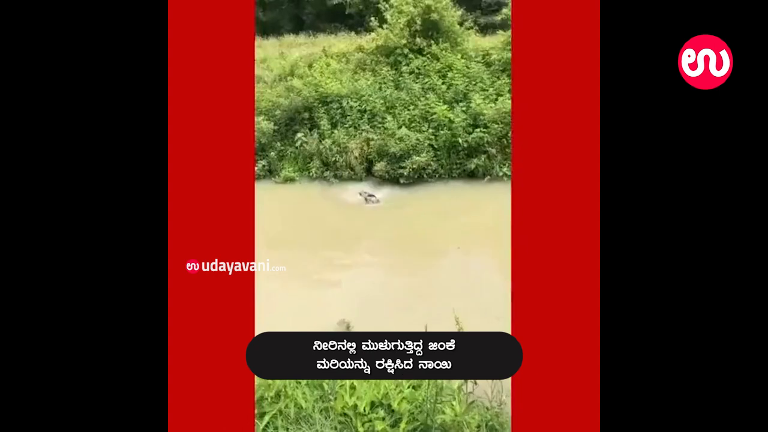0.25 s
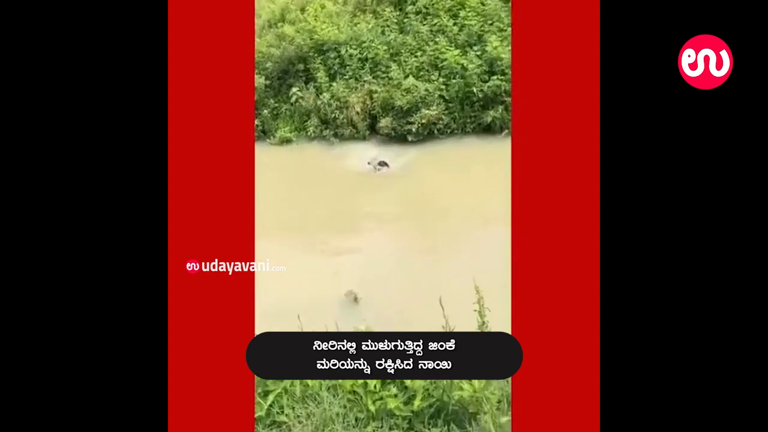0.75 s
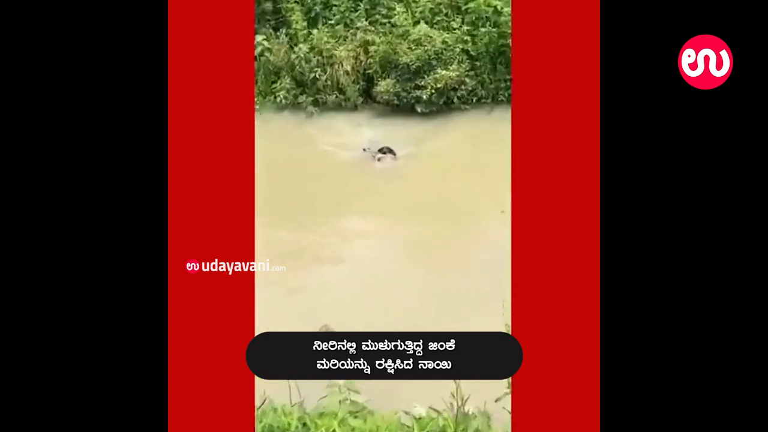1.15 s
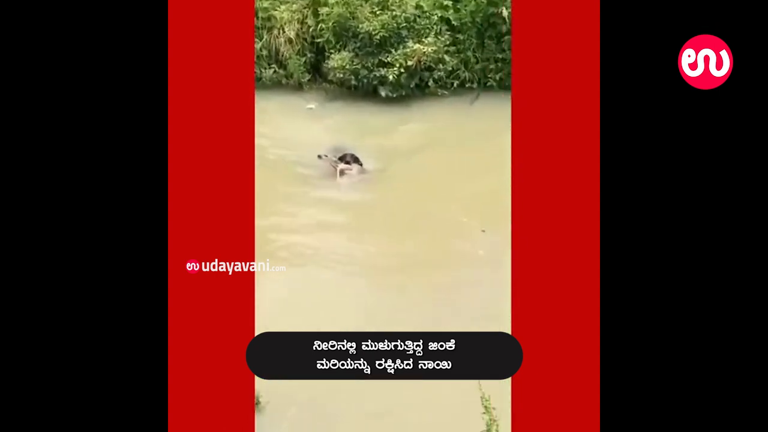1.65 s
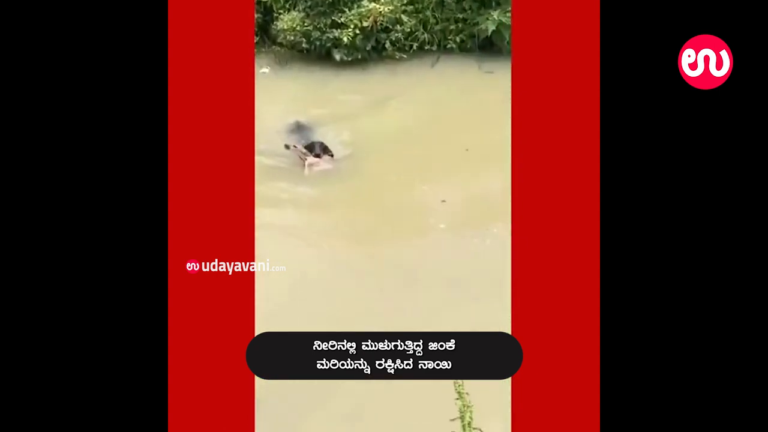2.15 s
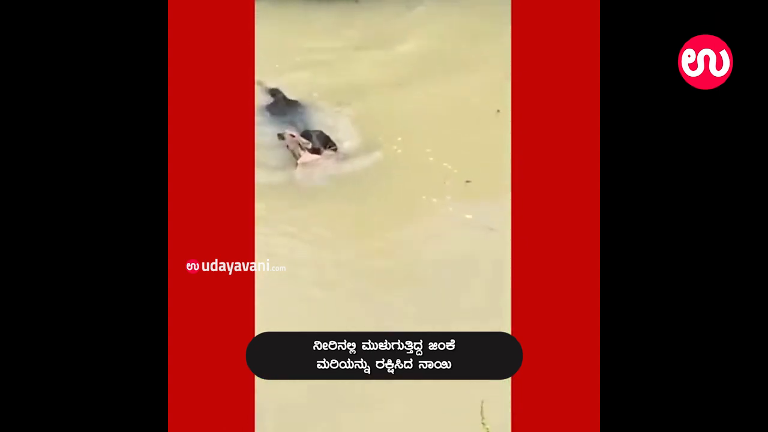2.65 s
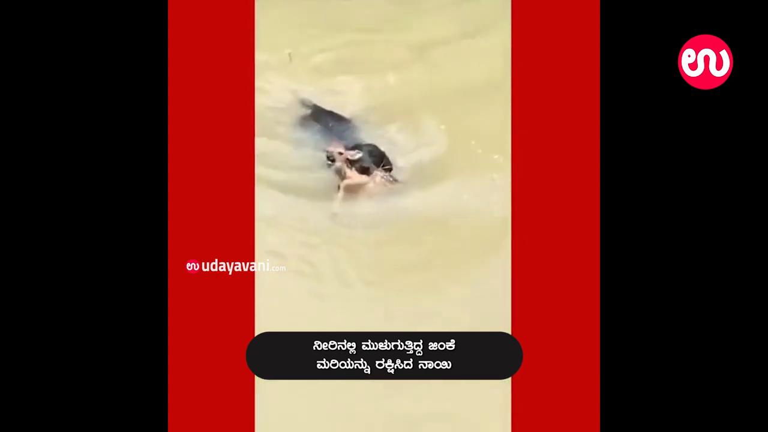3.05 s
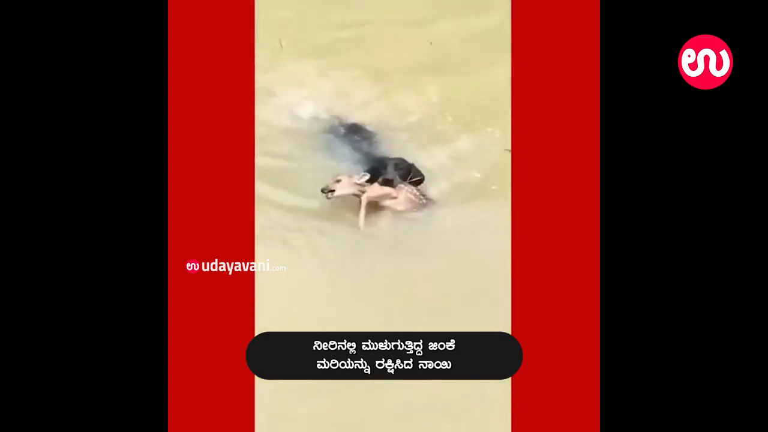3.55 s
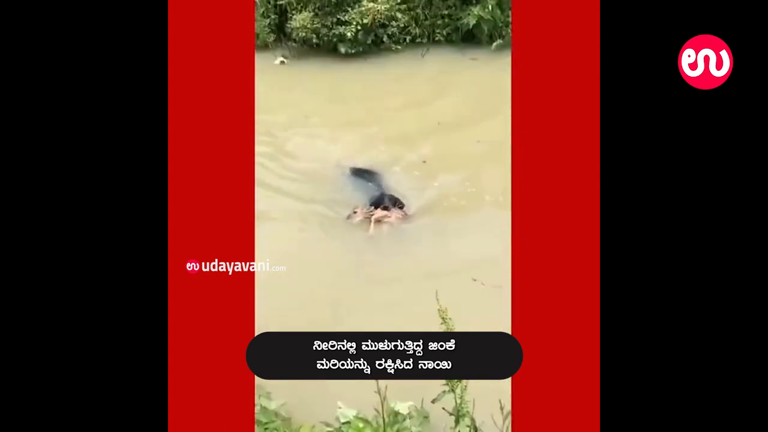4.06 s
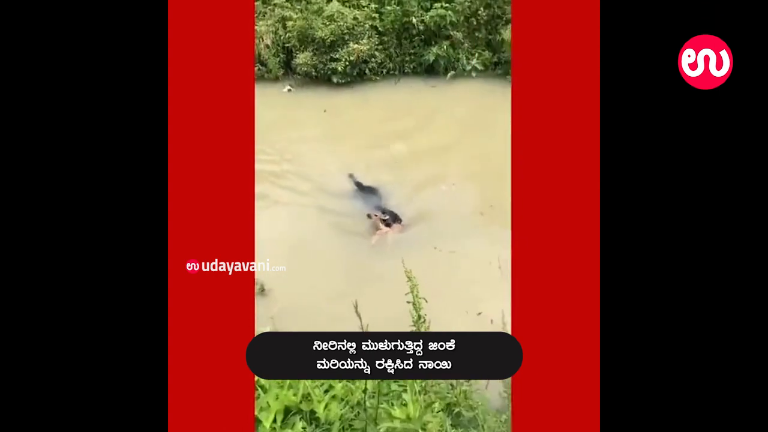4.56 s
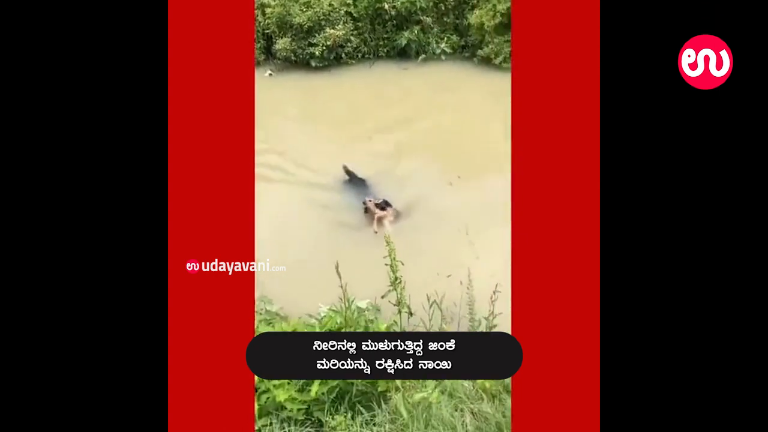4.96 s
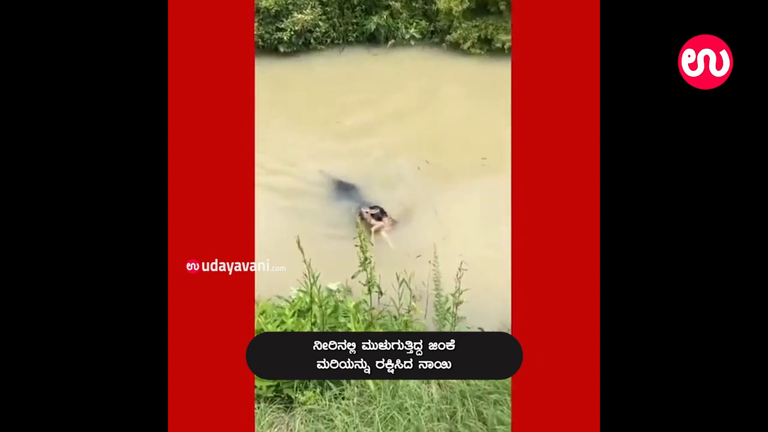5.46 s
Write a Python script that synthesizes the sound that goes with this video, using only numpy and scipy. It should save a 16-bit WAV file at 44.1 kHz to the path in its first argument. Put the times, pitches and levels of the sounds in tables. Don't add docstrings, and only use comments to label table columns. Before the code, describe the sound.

After about 0.3 s of silence the sound opens abruptly on an outdoor pond: a low single-cylinder engine putters at roughly ten pulses a second, slightly uneven, under a soft airy wash and shifting leaf hiss. Tiny bird chirps and ticks appear near 0.4 s and 1.4-1.85 s, with a light plop at 0.74 s. Paddling plops gather from 2.2 s, with faint twig snaps. A soft long snort begins at 3.0 s among more plops. From 3.22 to 3.66 s a fawn bleats once, very loud, shrill and nasal, rising slightly then falling, cracked and raspy before clearing and closing, with a faint dull echo. A strong wet snort and splashy plops come around 4.05-4.3 s, low thumps at 4.4 and 4.7 s, a chirp at 4.84 s, then a long hissing snort and plops at 5.0-5.25 s. Ticks and dry snaps finish over the unbroken engine, to about 5.6 s.

```python
import sys
import numpy as np
from scipy import signal
from scipy.fft import rfft, irfft
from scipy.io import wavfile
from scipy.ndimage import uniform_filter1d

SR = 44100
rng = np.random.default_rng(int(sys.argv[2]) if len(sys.argv) > 2 else 0)


def pcm_store(signal):
    levels = np.round(np.clip(np.atleast_2d(signal), -1, 1) * 32767)
    wavfile.write(sys.argv[1], SR, levels.astype(np.int16).T)


def volts_from_decibels(level):
    exponent = np.asarray(level, float) / 20
    return 10 ** exponent


N = 251370

START_S = 0.309

# (frequency [Hz], level [dB per Hz])
WASH = [(60, -18), (120, 6), (200, -4), (300, -13), (600, -16.5), (1000, -21.5), (1600, -20.5), (2500, -25),
        (3600, -26), (5000, -36.5), (7000, -48), (13000, -58.5)]
WASH_DB, WASH_FADE_DB_PER_S = -40, 0.38
# (frequency [Hz], width [Hz], level [dB])
HOUSING_HUMS = [(597, 46, -60), (988, 58, -59.5), (1597, 70, -61.5), (713, 14, -71.5)]
# (time [s], level [dB])
BREEZE = [(.32, -63), (.6, -70.5), (.78, -60.5), (1.54, -67.5), (1.84, -60), (2.09, -78.5), (2.95, -80.5),
          (3.1, -57), (3.7, -65.5), (4.0, -65), (4.1, -58), (4.18, -68), (4.99, -67), (5.05, -61.5),
          (5.16, -61), (5.21, -65.5), (5.3, -62), (5.7, -71)]
# (frequency [Hz], level [dB per Hz])
LEAF_COLOUR = [(1760, -42), (3000, -3.5), (3930, 0), (5610, -16), (9280, -15), (10900, -25.5), (13000, -22)]

# (time [s], peak level [dB], frequency [Hz])
TICKS = [(0.4165, -40, 3430), (2.341, -45, 3470), (2.7058, -43.5, 3440), (4.348, -39.5, 2910),
         (4.752, -36.5, 3530), (5.2206, -35.5, 3120), (5.233, -33.5, 2700)]
# (time [s], length [s], start frequency [Hz], end frequency [Hz], level [dB])
CHIRPS = [(0.4, 0.012, 3600, 3480, -41), (0.414, .014, 2760, 2760, -39.5), (.415, 0.042, 3500, 3430, -46),
          (1.44, 0.032, 3800, 3360, -48.5), (1.61, 0.03, 3900, 3680, -45), (1.63, .02, 3610, 3270, -52),
          (1.64, .028, 3950, 3650, -46), (1.694, 0.041, 3750, 3600, -55), (1.841, 0.014, 3720, 3430, -38),
          (1.847, 0.023, 3590, 3600, -44), (4.834, 0.013, 3710, 3420, -38),
          (4.839, 0.035, 3610, 3450, -43.5)]
# (time [s], level [dB], length [s])
SNAPS = [(2.356, -58, .012), (2.752, -51, .015), (2.872, -54, .009), (2.885, -53, .009), (5.267, -49, .009),
         (5.328, -56, .008), (5.446, -62, .01), (5.561, -52.5, .005)]
# (frequency [Hz], level [dB per Hz])
STALK_COLOUR = [(1500, -16.5), (3000, 3), (5500, 6), (8000, -18), (10000, -10), (13000, -27)]

# (time [s], firings so far [count])
CRANK = [(.3122, 0), (1.2763, 10), (1.4676, 12), (1.5671, 13), (1.7547, 15), (1.953, 17), (2.2428, 20),
         (2.8067, 26), (3.4771, 33), (3.7699, 36), (3.8618, 37), (4.0574, 39), (4.7271, 46), (4.9216, 48),
         (5.3043, 52), (5.5852, 55)]
# (frequency [Hz], peak pressure [1], swell time [s], delay [s])
BLOW_RINGS = [(91.4, .137, .0103, .0259), (121.8, .029, .0248, .0100), (177.5, .024, .0091, .0148)]
# (frequency [Hz], peak pressure [1], swell time [s], delay [cycles])
STROKE_RINGS = [(49.9, .070, .0197, .3936), (36.9, -.052, .0434, .3891), (75.9, .029, .0161, .5923)]
# (frequency [Hz], level [dB], swell time [s], delay after firing [s])
VALVE_KNOCKS = [(214, -43.5, 0.011, 0.023), (345.2, -38.5, 0.0062, .043), (349, -43.5, 0.0036, .023)]
ENGINE_DB = 0.5
IDLE_CYCLE_S, QUICK_DB_PER_MS, BLOW_SCATTER_DB = .096, .26, .7
MISFIRE, MISFIRE_DB = 38, -8

# (start [s], length [s], level [dB], nostril hiss level [dB])
SNORTS = [
    (3, 0.22, -51.5, -54.5),
    (4.033, .13, -41, -53),
    (4.219, 0.13, -47, -71),
    (5.006, 0.2, -44.5, -48),
]
# (frequency [Hz], level [dB per Hz])
NOSE_COLOUR = [(300, -11), (800, 4.5), (1300, -5), (2000, -16.5), (3000, -5.5), (4200, -10.5), (6000, -23),
               (9000, -27), (13000, -43.5)]
# (frequency [Hz], level [dB per Hz])
NOSTRIL_COLOUR = [(1800, -34), (2600, -4.5), (3200, 3), (3900, -16.5), (5500, -29)]
# (time [s], peak level [dB], frequency [Hz])
PLOPS = [(0.741, -38, 600), (1.299, -59, 587), (2.158, -40, 507), (2.214, -42, 577), (2.312, -38, 570),
         (2.749, -40.5, 460), (3.089, -38, 764), (3.114, -36, 548), (3.145, -37, 467), (3.162, -36, 800),
         (3.187, -41, 470), (4.062, -52, 734), (4.074, -43, 686), (4.1, -37, 390), (4.119, -29.5, 460),
         (4.127, -31, 740), (4.245, -37, 1020), (4.297, -38, 390), (4.813, -55, 525), (4.892, -40, 885),
         (5.088, -38, 666), (5.104, -35, 750), (5.126, -34.5, 970), (5.152, -34.5, 444), (5.261, -40, 418)]
# (time [s], peak level [dB])
THUMPS = [
    (4.4085, -31),
    (4.6995, -28.5),
]

# (time [s], frequency [Hz])
PITCH = [
    (3.222, 673),
    (3.272, 683.3),
    (3.312, 712.7),
    (3.36, 717.7),
    (3.42, 722.7),
    (3.50, 705.1),
    (3.605, 691.2),
    (3.657, 662),
]
# (time [s], effort [dB], lower resonance [Hz], upper resonance [Hz])
MOUTH = [
    (3.222, -17.5, 3030, 5850),
    (3.261, -10, 3314, 5560),
    (3.294, 0, 3343, 6700),
    (3.396, -1, 3274, 6370),
    (3.445, -7.5, 2960, 3850),
    (3.53, -6, 3290, 4397),
    (3.548, -8, 3320, 4660),
    (3.614, -13.5, 3548, 6750),
    (3.658, -28, 3760, 6580),
]
LOWER_WIDTH_HZ, UPPER_WIDTH_HZ, UPPER_DB, TILT_DB_PER_KHZ = 189, 1200, -13.5, 2
# (frequency [Hz], level [dB])
THROAT = [(700, -28), (1420, -18.5), (2130, -9), (5700, -17.5), (6400, -19), (7050, -32), (7750, -18),
          (8450, -17), (9150, -20.5), (9850, -31.5), (10600, -29), (11300, -41.5), (12600, -36),
          (13400, -27)]
# (time [s], depth [dB], share on overtone 5 rather than 4 [0-1])
SLIPS = [(3.23, -11, .2), (3.2766, 18, .45), (3.2913, 11, .99), (3.3125, 47, .78), (3.3293, 23, .95),
         (3.3545, 33, .12), (3.367, 22, .99), (3.3895, 16, .07), (3.406, 15, .99), (3.442, 27, .57),
         (3.449, 17, .99)]
# (from overtone [number], overtones back [count], shift [Hz])
COPIES = [(10, 8, 5512.5), (17, 14, 9690)]
# (frequency [Hz], level [dB per Hz])
BREATH_COLOUR = [(1500, 2), (3200, -15), (4800, 15), (6800, -2.5), (8600, -1), (10500, -30), (13000, -28.5)]
BREATH_DB, CLEAN_BREATH_DB = -19.5, -28
PUFF_DB, PUFF_S = 17, .012
SHUT_S, LEAK_DB_PER_S = 3.6, 366
RASP_FROM_S, RASP_TO_S, RASP_EDGE_S = 3.37, 3.485, .028
PATTERN, RASP_PATTERN = .06, .19
JITTER, RASP_JITTER, CLEAN_JITTER = .005, .006, .0013


def evened(x):
    return x / np.sqrt(np.mean(x ** 2) + 1e-20)


def drift(count, *sizes):
    x = rng.standard_normal(count)
    for size in sizes:
        x = uniform_filter1d(x, size=size)
    return evened(x)


def read(points, hz):
    f, value = np.transpose(points)
    return np.interp(np.log(hz + 1), np.log(f + 1), value)


def add(mix, s, sound):
    part = mix[round(s * SR):][:len(sound)]
    part += sound[:len(part)]


def noise(spectrum, patchy_db, flicker_db):
    frames, hz = N // 128 + 5, np.fft.rfftfreq(512, 1 / SR)
    a, b, patches = rng.standard_normal((frames, 257, 3)).T
    patches = uniform_filter1d(patches, size=8, axis=0)
    patches = evened(uniform_filter1d(patches, size=20, axis=1))
    level_db = read(spectrum, hz)[:, None] + patchy_db * patches + flicker_db * drift(frames, 6)
    z = (a + 1j * b) * volts_from_decibels(level_db)
    return evened(signal.istft(z, nperseg=512, noverlap=384)[1][:N])


def ring(t, hz, swell):
    u = np.maximum(t, 0)
    return u / swell * np.exp(1 - u / swell) * np.sin(2 * np.pi * hz * u)


def housing():
    hz = np.fft.rfftfreq(N, 1 / SR)
    shake = rfft(rng.standard_normal(N))
    out = np.zeros(N)
    for f, width, db in HOUSING_HUMS:
        out += volts_from_decibels(db) * evened(irfft(shake / (1 + (2 * (hz - f) / width) ** 2), N))
    return out


def air():
    t = np.arange(N) / SR
    breeze_db = np.interp(t, *np.transpose(BREEZE)) + 6.5
    leaves = volts_from_decibels(breeze_db) * noise(LEAF_COLOUR, patchy_db=-5.0, flicker_db=1.5)
    wash = volts_from_decibels(WASH_DB) * noise(WASH, patchy_db=1.1, flicker_db=0.4) + housing()
    return volts_from_decibels(WASH_FADE_DB_PER_S * (2.0 - t)) * wash + leaves


def small_sounds():
    out, t = np.zeros(N), np.arange(SR // 50) / SR
    for s, db, hz in TICKS:
        spray = .5 * rng.standard_normal(len(t)) * np.exp(-t / .002)
        add(out, s, volts_from_decibels(db) * (ring(t, hz, swell=0.0011) + 0.15 * spray))
    for s, length, hz_from, hz_to, db in CHIRPS:
        hz = np.linspace(hz_from, hz_to, round(length * SR))
        add(out, s, volts_from_decibels(db) * np.sin(2 * np.pi * np.cumsum(hz) / SR) * np.hanning(len(hz)))
    return out


def snaps():
    gate = np.zeros(N)
    for s, db, length in SNAPS:
        add(gate, s - length / 2, volts_from_decibels(db) * np.hanning(round(length * SR)))
    return gate * noise(STALK_COLOUR, patchy_db=2.0, flicker_db=1.0)


def engine():
    out, t = np.zeros(N), np.arange(SR // 4) / SR
    when, fired = np.transpose(CRANK)
    s = np.interp(np.arange(fired[-1] + 1), fired, when)
    quick_ms = 1000 * (IDLE_CYCLE_S - np.diff(s, prepend=s[0] - IDLE_CYCLE_S))
    blow_db = QUICK_DB_PER_MS * quick_ms + BLOW_SCATTER_DB * rng.standard_normal(len(s))
    blow_db[MISFIRE] = MISFIRE_DB
    cycles = np.diff(s, append=s[-1] + np.mean(np.diff(s)))
    chance = np.clip(rng.standard_normal((len(s), 3, 3)), -1.6, 1.6)
    for at, db, cycle, (wobble, force, late) in zip(s, blow_db, cycles, chance):
        for hz, peak, swell, delay in BLOW_RINGS:
            add(out, at, volts_from_decibels(db) * peak * ring(t - delay, hz, swell))
        for g, (hz, peak, swell, delay) in zip(wobble, STROKE_RINGS):
            add(out, at, volts_from_decibels(0.48 * g) * peak * ring(t - delay * cycle, hz, swell))
        for g, lag, (hz, knock_db, swell, delay) in zip(force, late, VALVE_KNOCKS):
            knock = ring(t - delay - 0.00204 * lag, hz * (1 + 0.033 * g), swell)
            add(out, at, volts_from_decibels(knock_db + 1.3 * g) * knock)
    return volts_from_decibels(ENGINE_DB) * out


def dog():
    gate, hiss, out, t = np.zeros(N), np.zeros(N), np.zeros(N), np.arange(SR // 20) / SR
    for s, length, db, hiss_db in SNORTS:
        blow = signal.windows.tukey(round(length * SR), .8)
        add(gate, s, volts_from_decibels(db) * blow)
        add(hiss, s, volts_from_decibels(hiss_db) * blow)
    for s, db, hz in PLOPS:
        add(out, s, volts_from_decibels(db) * ring(t, hz * (1 - 6 * t), swell=0.0023))
        add(out, s, volts_from_decibels(db - 3.5) * ring(t - .004, hz * 1.49, swell=0.0013))
    for s, db in THUMPS:
        turns = 170 * t + 2.0 * (1 - np.exp(-t / .0025))
        add(out, s, volts_from_decibels(db) * np.sin(2 * np.pi * turns) * np.exp(-t / .011))
    snort = gate * noise(NOSE_COLOUR, patchy_db=0.5, flicker_db=5.0)
    return out + snort + hiss * noise(NOSTRIL_COLOUR, patchy_db=0.0, flicker_db=-5.5)


def banks(x):
    t = np.arange(SR) / SR
    taps = rng.choice([-1., 1.], len(t)) * (rng.random(len(t)) < .03)
    taps = taps * volts_from_decibels(-60 * t / .95) * (t > .09)
    dull = signal.sosfilt(signal.butter(3, 4600, fs=SR, output="sos"), x)
    sway = drift(N, 90)
    return signal.fftconvolve(dull, taps / np.linalg.norm(taps))[:N] * (.8 + .55 * sway)


def mouth(hz, effort_db, lower_hz, upper_hz):
    lower = 1 / (1 + 2j * (hz - lower_hz) / LOWER_WIDTH_HZ)
    upper = volts_from_decibels(UPPER_DB) / (1 + 2j * (hz - upper_hz) / UPPER_WIDTH_HZ)
    return effort_db + TILT_DB_PER_KHZ * (hz / 1000 - 3.5) + 20 * np.log10(abs(lower + upper))


def throat_catches(t):
    at, depth_db, upper = np.transpose(SLIPS)
    dip4_db, dip5_db = depth_db * (1 - upper), depth_db * upper
    gap = t[:, None] - at
    notch = 1 / (1 + (gap / 0.0013) ** 2)
    swing = np.tanh(gap / .0012) * np.exp(-abs(gap) / .007)
    catch_db = {4: -notch @ dip4_db, 5: -notch @ dip5_db}
    kick = {4: swing @ dip4_db / 90, 5: swing @ dip5_db / 70}
    others_db = .3 * (-notch @ np.maximum(dip4_db + dip5_db, 0))
    return catch_db, kick, others_db


def bleat():
    s, *controls = np.transpose(MOUTH)
    t = np.arange(s[0], s[-1], 1 / SR)
    hz = np.interp(t, *np.transpose(PITCH))
    shape = [np.interp(t, s, c) for c in controls]
    loud_db = [mouth(k * hz, *shape) for k in range(4, 8)]
    effort_db = np.mean(loud_db, axis=0)
    turns = np.cumsum(hz) / SR
    shut_for = np.maximum(t - SHUT_S, 0)

    rasp, strained = np.clip([(t - RASP_FROM_S) / RASP_EDGE_S, (RASP_TO_S - t) / RASP_EDGE_S], 0, 1)
    pattern = strained * (PATTERN + (RASP_PATTERN - PATTERN) * rasp)
    jitter = CLEAN_JITTER + strained * (JITTER + (RASP_JITTER - JITTER) * rasp - CLEAN_JITTER)
    shake = jitter * drift(len(t), 120, 60)
    unsteady = 1 + .28 * drift(len(t), 300, 200)
    triple = pattern * unsteady * np.exp(2j * np.pi * turns / 3)
    catch_db, kick, others_db = throat_catches(t)

    breath_db = CLEAN_BREATH_DB + strained * (BREATH_DB - CLEAN_BREATH_DB)
    breath_db = breath_db + PUFF_DB * np.exp((s[0] - t) / PUFF_S) + LEAK_DB_PER_S * shut_for
    out = volts_from_decibels(effort_db + breath_db) * noise(BREATH_COLOUR, patchy_db=0.0, flicker_db=1.5)[:len(t)]
    for k in range(1, 19):
        back, shift_hz = max([(0, 0)] + [row[1:] for row in COPIES if k >= row[0]])
        source = k - back
        wander = drift(len(t), 900, 500)
        if 4 <= k <= 7:
            db = loud_db[k - 4]
        else:
            db = effort_db + read(THROAT, source * hz + shift_hz) + 0.3 * k * wander
        if k == 8:
            db = db + 0.9 * (effort_db - loud_db[2])
        if k > 6:
            db = db - 260 * shut_for
        if k < 3:
            db = db - 40 * np.maximum(3.33 - t, 0)
        db = db + catch_db.get(source, others_db)

        share = .9 if k > 8 else 1.4 if k == 3 else .6 if k < 3 else 1
        centre_db = mouth(k * hz, *shape)
        above = volts_from_decibels(0.6 * (mouth((k + 1 / 3) * hz, *shape) - centre_db))
        below = volts_from_decibels(0.6 * (mouth((k - 1 / 3) * hz, *shape) - centre_db))
        sidebands = above * triple + 0.5 * below * triple.conj()
        cycles = source * (turns + shake) + shift_hz * t + kick.get(source, 0) + rng.random()
        wave = (1 + share * np.exp(1j * wander) * sidebands) * np.exp(2j * np.pi * cycles)
        out += np.sqrt(2) * volts_from_decibels(db) * wave.real
    fade_in = np.clip((t - s[0]) / .003, 0, 1)
    fade_out = np.clip((s[-1] + .002 - t) / .014, 0, 1)
    return s[0], out * fade_in * fade_out


def scene():
    fawn = np.zeros(N)
    add(fawn, *bleat())
    echo = volts_from_decibels(-33) * banks(fawn)
    return (air() + small_sounds() + snaps() + engine() + dog() + echo + fawn)[None]


def starve(x, under_db):
    hz, _, z = signal.stft(x, SR, nperseg=2048)
    power = abs(z) ** 2
    band = np.repeat(power[:1024].reshape(128, 8, -1).mean(axis=1), 8, axis=0)
    tilt_db = read([(800, -8), (1200, -1), (2500, 0), (6500, -6), (13000, -12)], hz[:1024])
    limit = power[hz > 1500].sum(axis=0) * volts_from_decibels(2 * (under_db + tilt_db))[:, None]
    z[:1024] *= np.where((band < limit) & (hz[:1024, None] > 860), .08, 1)
    return signal.istft(z, SR, nperseg=2048)[1][:N]


def roll_off(x):
    return signal.sosfilt(signal.butter(12, 13500, fs=SR, output="sos"), x)


def record(dry):
    opened = dry[0] * np.clip((np.arange(N) / SR - START_S) / 0.011, 0, 1)
    rounded = opened / (1 + abs(opened) ** 8) ** (1 / 8)
    thinned = starve(rounded, under_db=-51.5)
    return roll_off(thinned[None])


dry = scene()
out = record(dry)
pcm_store(out)
```